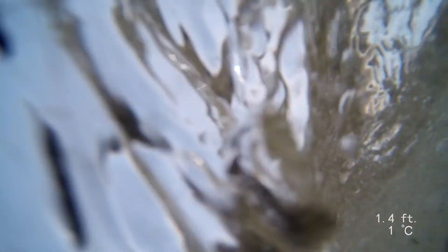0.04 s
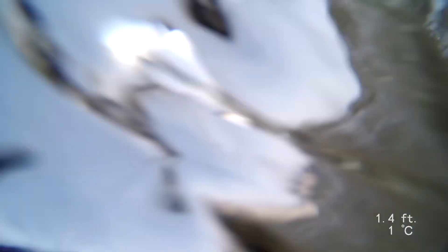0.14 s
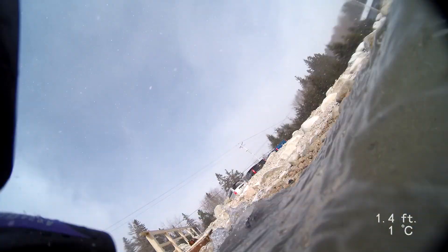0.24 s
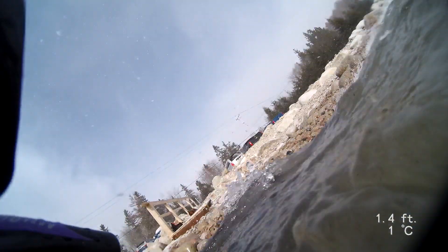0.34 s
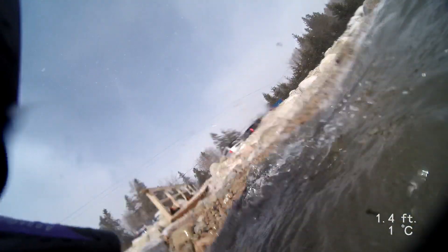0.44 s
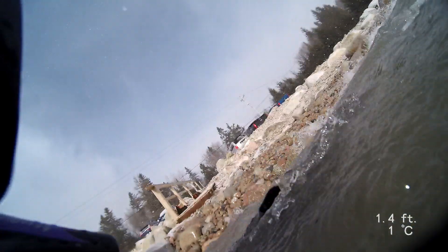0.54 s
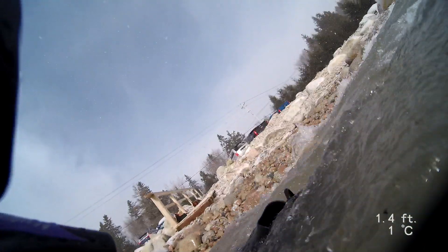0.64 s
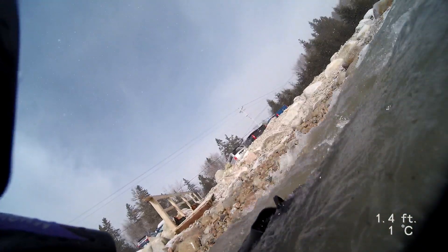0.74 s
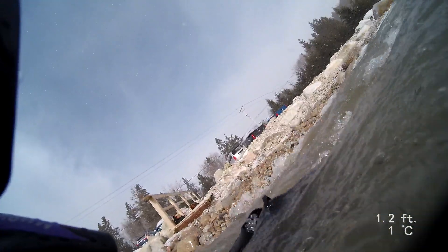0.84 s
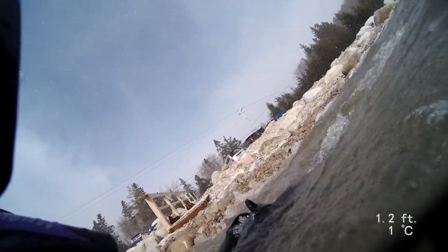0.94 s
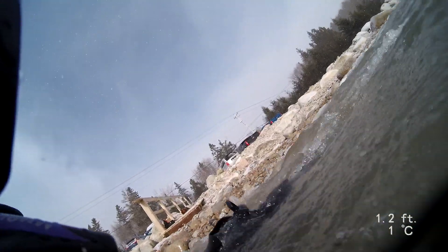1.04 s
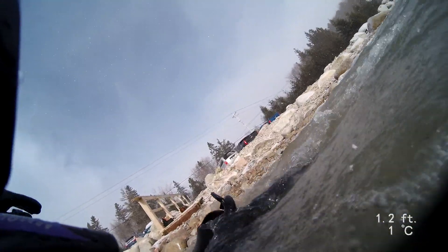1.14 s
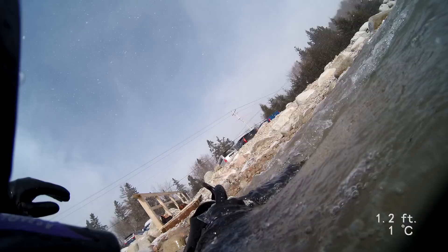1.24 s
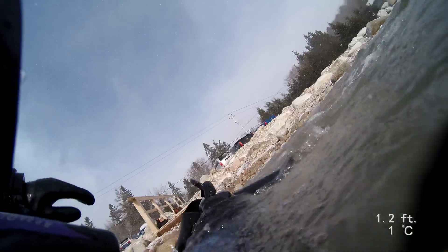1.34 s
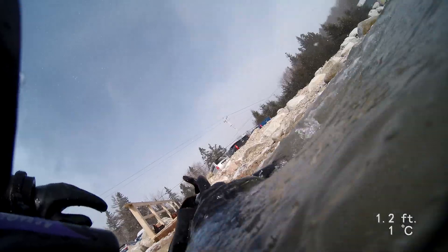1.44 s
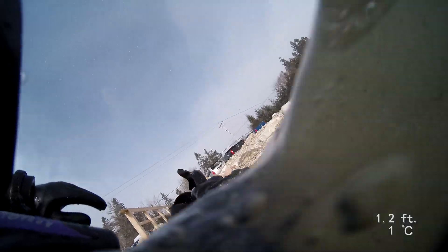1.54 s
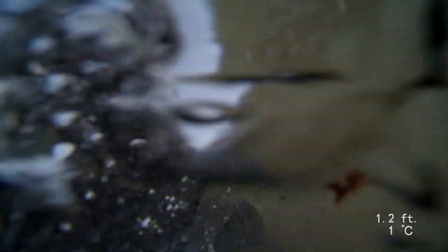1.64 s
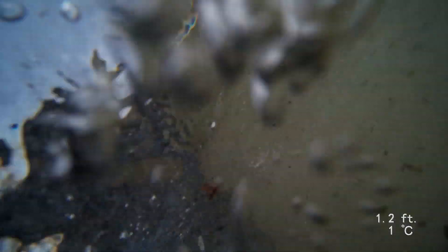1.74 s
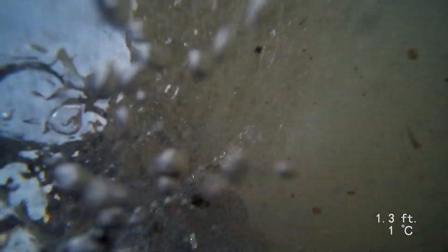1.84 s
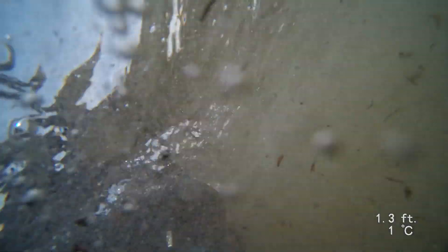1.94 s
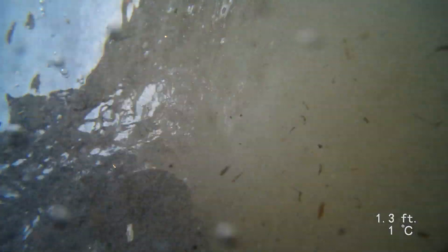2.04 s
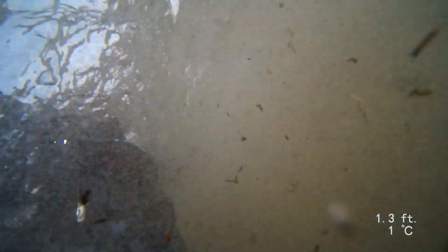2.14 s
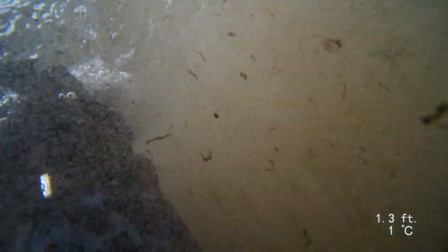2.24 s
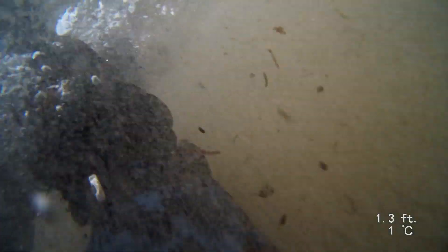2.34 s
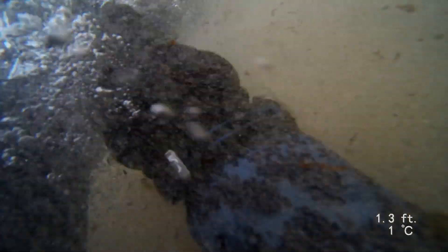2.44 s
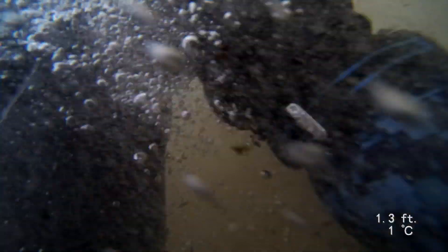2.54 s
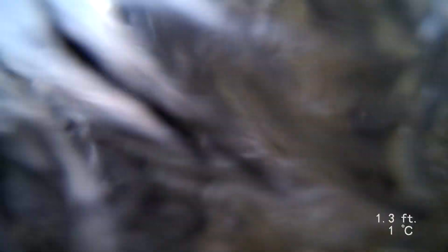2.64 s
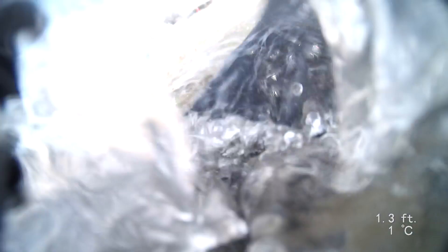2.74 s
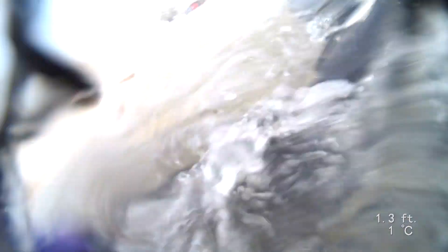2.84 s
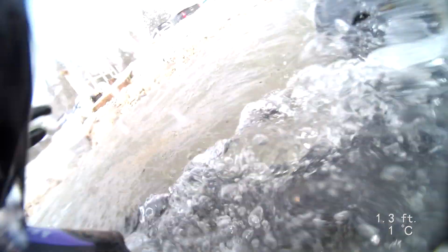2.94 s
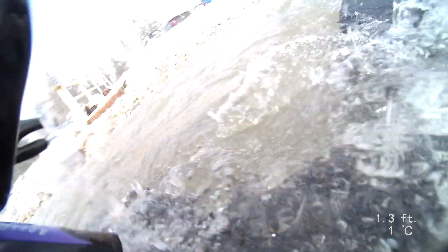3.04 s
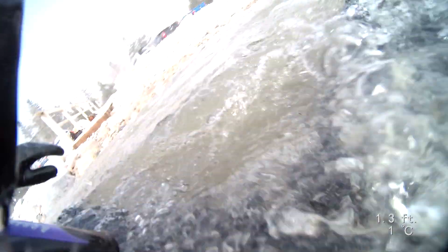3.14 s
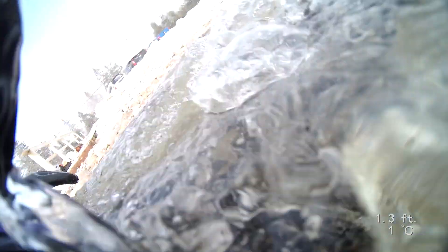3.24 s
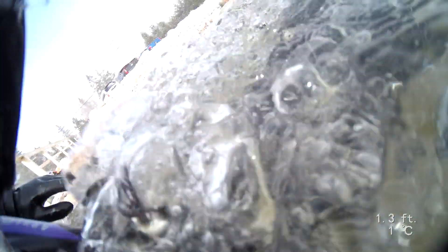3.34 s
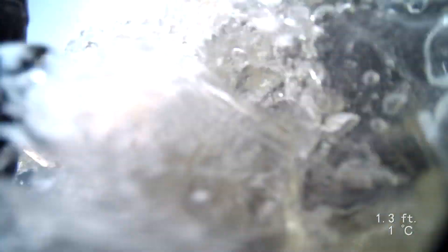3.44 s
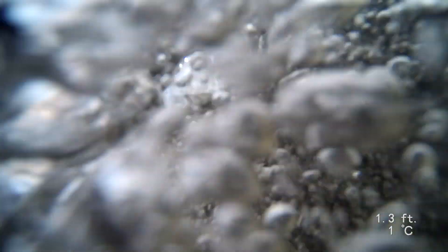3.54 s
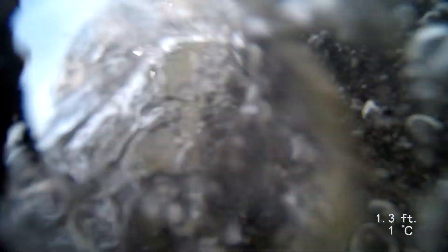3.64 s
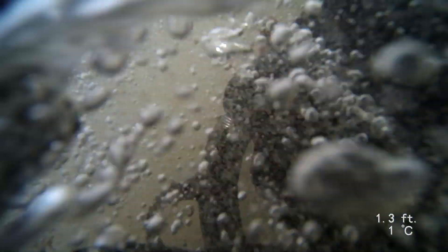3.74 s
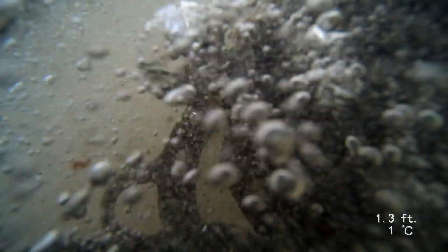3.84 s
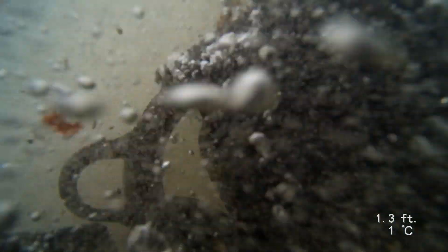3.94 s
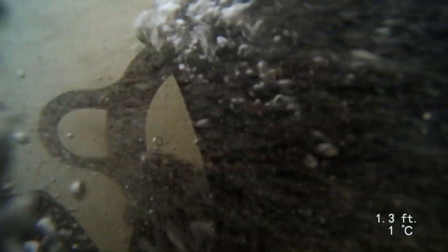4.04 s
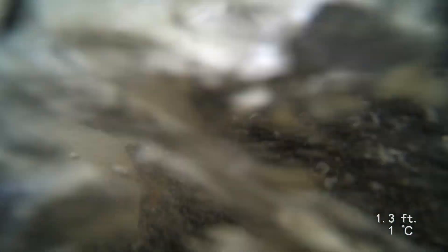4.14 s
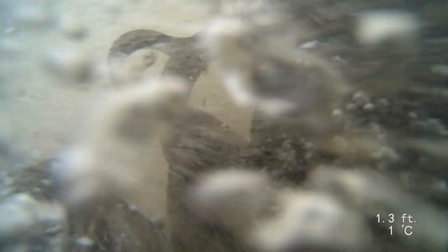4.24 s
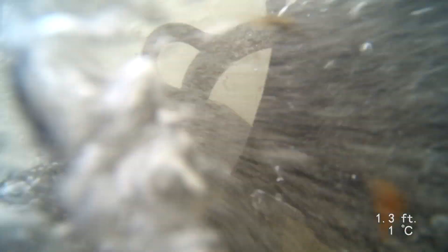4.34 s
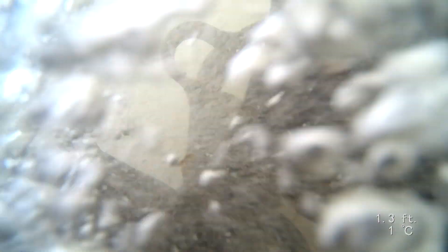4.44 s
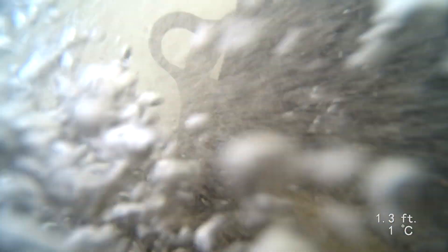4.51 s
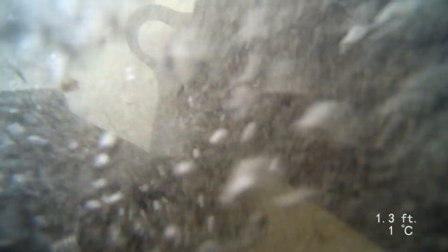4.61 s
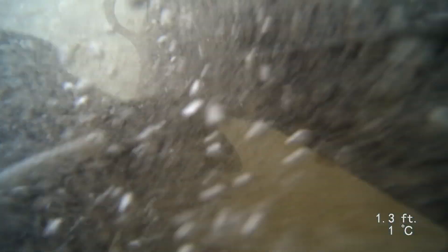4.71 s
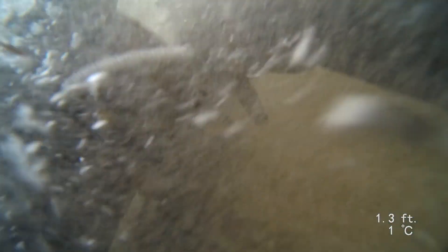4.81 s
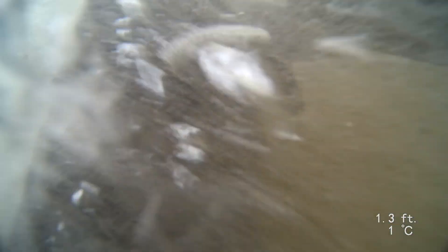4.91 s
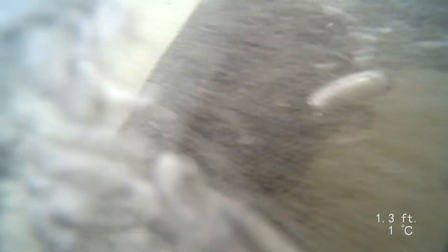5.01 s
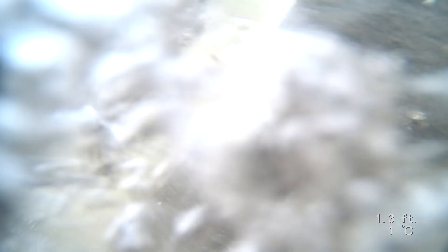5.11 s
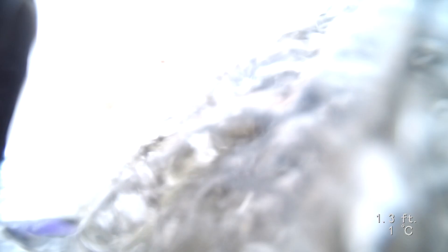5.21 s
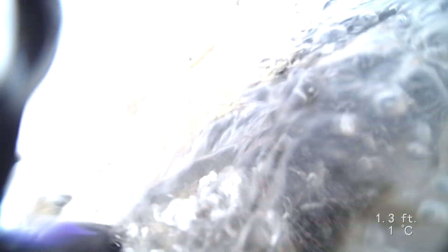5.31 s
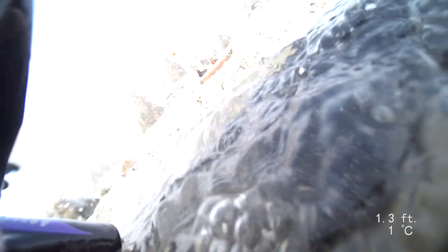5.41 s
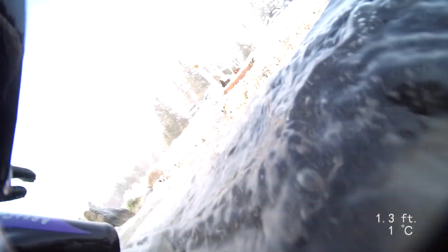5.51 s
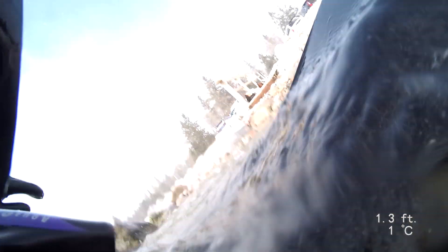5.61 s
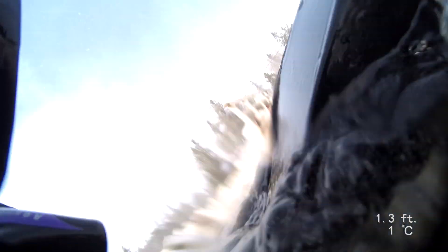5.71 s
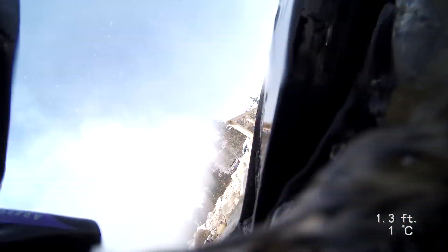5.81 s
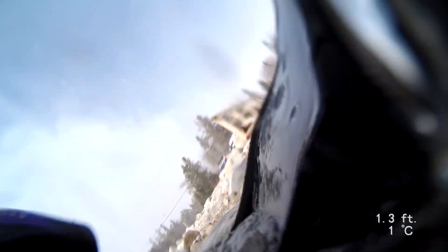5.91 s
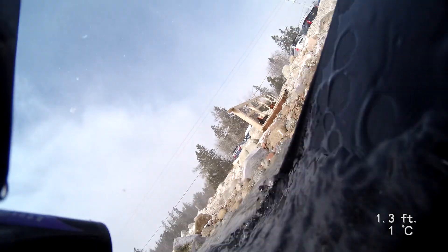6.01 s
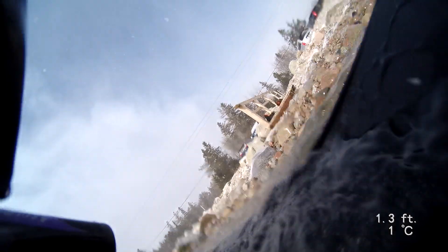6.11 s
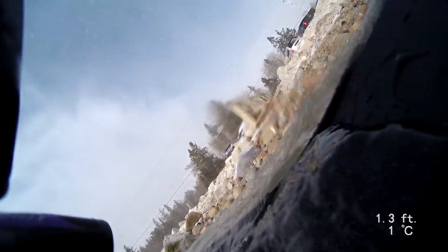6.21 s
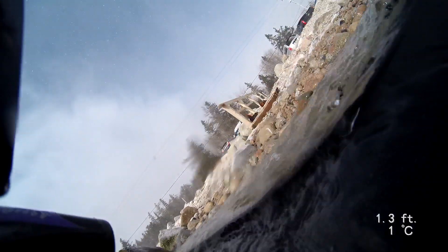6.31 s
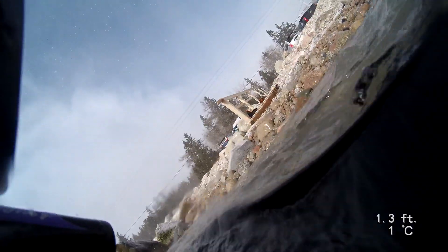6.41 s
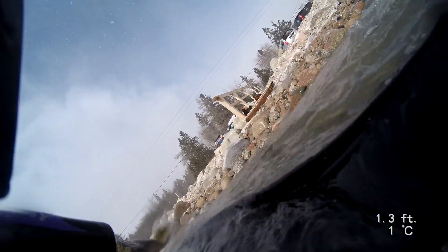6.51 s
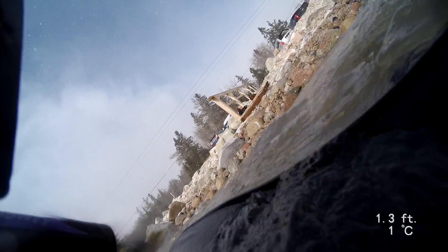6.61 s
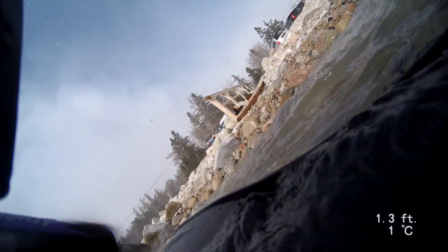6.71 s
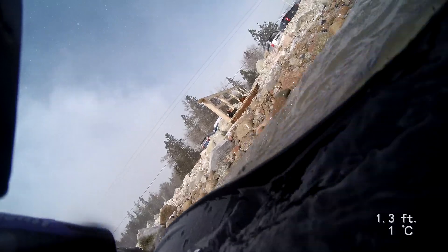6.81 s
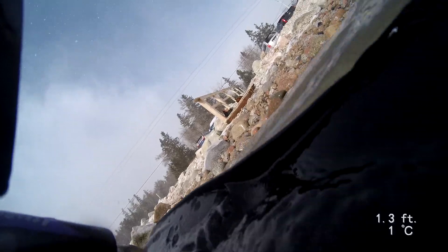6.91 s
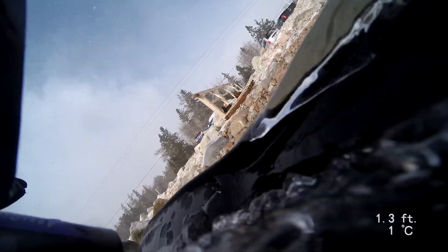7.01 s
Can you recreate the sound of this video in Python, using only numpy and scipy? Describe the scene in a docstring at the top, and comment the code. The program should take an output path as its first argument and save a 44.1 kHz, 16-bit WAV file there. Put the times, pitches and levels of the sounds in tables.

```python
"""In shallow water, someone wades with a camera in a waterproof case.
Sloshing is made of many random bubbles, slaps and noise; spray is a crowd of tiny bursts and pings.
Single bubbles, drops, gliding tones and soft thumps stand out, with two hisses of draining water.
The case lets little of the sloshing's bass through and adds a hollow ring, strong near 1 kHz.
Behind it all are steady microphone hiss and a thin electronic whine."""
import sys
import numpy as np
from scipy import signal
from scipy.fft import irfft
from scipy.io import wavfile
from scipy.ndimage import uniform_filter1d, map_coordinates

SR = 44100
rng = np.random.default_rng(int(sys.argv[2]) if len(sys.argv) > 2 else 0)


def put_to_file(sound):
    """Save the sound as 16-bit audio at rate SR, in the file named by the first command-line argument."""
    columns = np.atleast_2d(sound).T  # one column per channel
    safe = np.clip(columns, -1, 1)
    whole_steps = np.round(safe * 32767)
    wavfile.write(sys.argv[1], SR, whole_steps.astype(np.int16))


N = 311346
TIME = np.arange(N) / SR  # seconds
BINS = np.linspace(0, SR / 2, 4097)  # frequencies in Hz at which filters are drawn


def amp(db):
    """Turns decibels into a plain factor."""
    return 10 ** (np.asarray(db) / 20)


def evened(x):
    """Scales a sound to unit average loudness (RMS)."""
    return x / np.sqrt(np.mean(x ** 2) + 1e-20)


def add(mix, start_s, sound):
    """Adds a sound into the mix at a start time, cut off at the end of the mix."""
    part = mix[max(round(start_s * SR), 0):][:len(sound)]
    part += sound[:len(part)]


def curve(rows, axis=1):
    """One column of a table, joined by straight lines in time."""
    columns = np.transpose(rows)
    return np.interp(TIME, columns[0], columns[axis])


def read(points, hz):
    """Reads a colour in dB between its points, on a log-frequency axis."""
    point_hz, db = np.transpose(points)
    return np.interp(np.log(hz + 1), np.log(point_hz), db)


def causal(db):
    """The filter with this gain that responds as early as possible (minimum phase)."""
    mirrored_db = np.r_[db, db[-2:0:-1]]
    log_gain = np.log(amp(mirrored_db))
    spectrum = np.exp(np.conj(signal.hilbert(log_gain)))
    return irfft(spectrum[:len(db)])[:len(db)]


# Resonances of the case. Each row: pitch in Hz, width in Hz, level in dB before the overall slope is removed.
CASE_RESONANCES = [(798.4, 55, -5), (999, 115, -8), (1395, 40, -10), (1750, 160, -12.5), (2072, 180, -10.5),
                   (2930, 80, -11.5), (3787, 370, 1.5), (4870, 80, -11), (6000, 380, 3.5), (7140, 93, -16),
                   (8230, 320, -10), (12700, 180, -28), (14100, 700, -36)]


def case_ripple():
    """Peaks and valleys of the case's resonances in dB, without their overall slope."""
    power = sum(amp(db) ** 2 / (1 + (2 * (BINS - hz) / width) ** 2) for hz, width, db in CASE_RESONANCES)
    db = 10 * np.log10(power)
    return db - uniform_filter1d(db, size=170)


def tint(x, colour, ring=0):
    """Filters a sound to a colour; ring sets how strongly the case's resonances shape it."""
    return signal.oaconvolve(x, causal(read(colour, BINS) + ring * case_ripple()))[:N]


def steadied(x, seconds):
    """Evens out the loudness over about the given time, with the finer grain left in."""
    window = signal.windows.hann(int(seconds * SR))
    power = signal.oaconvolve(evened(x) ** 2, window / window.sum(), "same")
    return evened(x) / np.sqrt(abs(power) + 0.0018)


CLUMP_S = 0.024  # seconds; churned water breaks in uneven clumps


def clumps(seconds=CLUMP_S):
    """Random swells and gaps of about this length, of unit size."""
    window = signal.windows.hann(int(seconds * SR))
    return evened(signal.oaconvolve(rng.standard_normal(N), window, "same"))


RING_WANDER, WANDER_S = 0.028, 0.22  # typical drift as a share of pitch, length of a drift in seconds


def wandering(x):
    """Plays a sound slightly faster and slower, so its ring drifts as water covers more or less of the case."""
    place = np.cumsum(1 + RING_WANDER * clumps(WANDER_S))
    return map_coordinates(x, [place], order=3, mode="mirror")


def bubble(hz, t60, glide_per_s=4.8, swell=31.0, kick=0.031):
    """Trapped air starts with a kick, swells into a ring and glides in pitch; t60 is its fade in seconds."""
    t = np.arange(int(1.3 * t60 * SR)) / SR
    age = t / t60
    fade = np.exp(-np.log(1000) * age)  # 60 dB down at age 1
    level = (kick + (1 - np.exp(-swell * age)) ** 2) * fade
    level *= 1 - np.exp(-2 * hz * t)  # even the kick takes about half a cycle
    turns = hz * t * (1 + glide_per_s * t / 2) + rng.random()
    return level / level.max() * np.sin(2 * np.pi * turns)


GLIDE_SPREAD_PER_S = 14  # widest glide in one second, as a share of the bubble's pitch


def stray_bubble(hz, t60):
    """A bubble that glides up or down by chance."""
    return bubble(hz, t60, glide_per_s=GLIDE_SPREAD_PER_S * rng.uniform(-0.98, 1))


def spatter(hz, burst_s, octaves=0.32, skirt_db=-24):
    """Water smacks the case: a very short burst of noise, focused around a pitch and weak in the bass."""
    t = np.arange(int(7 * burst_s * SR)) / SR
    burst = rng.standard_normal(len(t)) * t ** .5 * np.exp(-t / burst_s)
    focus_db = np.maximum(-4 * (np.log2((BINS + 1) / hz) / octaves) ** 2, skirt_db)
    bass_cut_db = read([(300, -24), (750, 0)], BINS)
    smack = signal.fftconvolve(burst, causal(focus_db + bass_cut_db)[:512])
    return smack / abs(smack).max()


def clicks(per_s, spread_db):
    """Random impulses: many small, a few large."""
    size = amp(spread_db * np.minimum(rng.exponential(1, N), 4))
    return size * rng.choice([-1, 1], N) * (rng.random(N) < per_s / SR)


def swarm(grain, low_hz, high_hz, per_s, length_s, spread_db, count=64):
    """Grains of many pitches, each at its own random moments; the higher ones are shorter on average."""
    out = np.zeros(N)
    tries = 200  # possible moments for each pitch
    for hz in np.geomspace(low_hz, high_hz, count):
        length = length_s * (.5 + rng.random()) * np.sqrt(low_hz / hz)
        sound = grain(hz, length)
        sound = sound / np.linalg.norm(sound)
        for at, size, chance in rng.random((tries, 3)):
            if chance < per_s * N / SR / count / tries:
                add(out, at * N / SR, sound * amp(-spread_db * np.log(max(size, .02))))
    return evened(out)


# Surges of water against the case, each a swell, a hold and an ebb. Each row: start of full strength
# in seconds, hold, swell and ebb in seconds, then sloshing, spray and flow in dB at mid-hold, before
# each layer's own mixing and clumps.
SURGES = [(-0.009, 0.26, 0.1, 0.044, -41.5, -55.5, -70), (0.161, 0.23, 0.0087, 0.026, -40.5, -52, -71),
          (1.474, 0.049, 0.055, 0.012, -56, -57, -84), (1.536, 0.031, 0.012, 0.034, -35, -44, -67),
          (1.593, 0.17, 0.04, 0.1, -37, -48.5, -59), (1.85, 0.12, 0.0059, 0.076, -56.5, -63, -74),
          (2.109, 0.071, 0.018, 0.045, -58, -60.5, -72.5), (2.323, 0.076, 0.013, 0.027, -83, -57.5, -78),
          (2.418, 0.035, 0.0086, 0.056, -42.5, -53, -64), (2.5, 0.015, 0.025, 0.034, -40.5, -55, -80),
          (2.614, 0.14, 0.082, 0.13, -35.5, -45.5, -64), (3.552, 0.076, 0.017, 0.068, -44, -51.5, -61.5),
          (3.821, 0.035, 0.0067, 0.28, -40, -56.5, -64), (3.979, 0.011, 0.074, 0.068, -34, -48, -58),
          (4.119, 0.25, 0.11, 0.28, -33, -49.5, -58), (4.405, 0.18, 0.033, 0.13, -36.5, -56, -57.5),
          (4.665, 0.055, 0.026, 0.26, -34, -51, -57.5), (4.923, 0.08, 0.2, 0.047, -34, -56.5, -61),
          (5.026, 0.081, 0.082, 0.11, -31, -40, -58.5), (5.143, 0.043, 0.082, 0.1, -32.5, -59, -58.5),
          (5.647, 0.0049, 0.0092, 0.014, -30.5, -37.5, -75),
          (5.692, 0.01, 0.011, 0.034, -30.5, -42.5, -53.5), (5.799, 0.16, 0.059, 0.06, -40, -54.5, -67),
          (5.949, 0.059, 0.069, 0.05, -42.5, -58, -83), (6.941, 0.099, 0.038, 0.087, -33.5, -46, -61.5)]
# Change in dB over the hold, in this order: sloshing, spray, flow.
SURGE_TREND_DB = (0.5, -2.5, -1)
SURGE_DEPTH_DB = 20  # what a surge gains over its swell time and loses over its ebb time
CALM_SPRAY_DB, CALM_FLOW_DB = -63.5, -81.5  # between surges, before each layer's own mixing


def stirred(calm_db, axis):
    """Level in dB of sloshing (axis 0), spray (1) or flow (2): surges add their power to the calm water."""
    t = TIME[::40]
    power = np.zeros(len(t))
    for s, hold, swell, ebb, *levels_db in SURGES:
        away = np.maximum(s - t, 0) / swell + np.maximum(t - s - hold, 0) / ebb
        trend_db = SURGE_TREND_DB[axis] * (np.clip((t - s) / hold, 0, 1) - .5)
        surge_db = levels_db[axis] + trend_db - SURGE_DEPTH_DB * np.minimum(away, 10)
        power += amp(surge_db) ** 2
    return 10 * np.log10(amp(calm_db) ** 2 + np.interp(TIME, t, power))


# Colours of the churned water and of the soft wash. Each row: frequency in Hz, relative level in dB.
SLOSH_COLOUR = [(30, -65), (170, -25), (350, -42), (560, -11), (760, -7), (980, 4.5), (1200, -3),
                (1900, -2.5), (2700, -10.5), (4000, -47), (8000, -76), (16000, -86)]
LAPPING_COLOUR = [(100, -19.5), (600, -24.5), (850, -4), (1000, 1), (1300, -7.5), (2100, -5), (3000, -20.5),
                  (8000, -34)]
# Ripples lapping between surges. Each row: time in seconds, level in dB before near and far water are mixed.
CALM = [(0.4, -56), (1.12, -57.5), (1.38, -64.5), (2.0, -59.5), (2.85, -60), (3.42, -61.5), (3.65, -57),
        (5.25, -50), (5.36, -63), (5.6, -70.5), (6.2, -60), (6.42, -71.5), (6.85, -62.5)]
CLUMP_DB = 2  # typical swing of the sloshing


def sloshing(bunching):
    """Churned water: big bubbles and slaps over a froth, with more small bubbles as spray gains on sloshing."""
    level_db = stirred(curve(CALM), axis=0)
    spray_db = stirred(CALM_SPRAY_DB, axis=1)
    big = swarm(stray_bubble, 675.0, 1445, per_s=420, length_s=0.039, spread_db=3.5)
    small = swarm(stray_bubble, 1410, 4940, per_s=400, length_s=0.028, spread_db=7.0)
    slaps = swarm(spatter, 863, 4570, per_s=400, length_s=0.003, spread_db=5.0)
    froth = rng.standard_normal(N)
    small_db = np.clip(spray_db - level_db + 21.0, 2, 10)
    churn = big + amp(small_db) * small + amp(-1.5) * slaps + amp(-6.0) * froth
    churn = wandering(tint(churn, SLOSH_COLOUR, ring=1.0))
    near = steadied(churn, 0.066) * amp(CLUMP_DB * bunching)
    # in calm moments almost only the soft wash of ripples along the shore is left
    ripples = swarm(bubble, 735, 3270, per_s=270, length_s=0.021, spread_db=4.5)
    wash = rng.standard_normal(N) + amp(-7.0) * ripples
    far = steadied(tint(wash, LAPPING_COLOUR, ring=1.0), 0.13)
    far_share = np.clip(np.interp(level_db, [-54, -44], [1, .02]), 0, 1)
    return amp(level_db) * (np.sqrt(1 - far_share) * near + np.sqrt(far_share) * far)


# Colour of the spray and of the bubbles' smacks. Each row: frequency in Hz, relative level in dB.
SPRAY_COLOUR = [(100, -50), (600, -54), (1000, 12), (2500, 1.5), (4000, -7), (6000, -9.5), (8500, -11.5),
                (11000, -14.5), (15000, -10)]
SPRAY_CLUMP_DB = 3  # typical swing of the spray


def spray(bunching):
    """Droplets patter on the case and tiny bubbles ping; heavy spray crackles, calm water has almost none."""
    spray_db = stirred(CALM_SPRAY_DB, axis=1)
    level = np.maximum(amp(spray_db) - amp(-66), 0)  # the subtraction thins out the calm
    patter = swarm(spatter, 2360, 25900, per_s=340, length_s=0.0019, spread_db=7.0)
    fizz = swarm(bubble, 3104, 12500, per_s=820, length_s=0.011, spread_db=6.5)
    crowd = swarm(spatter, 2300, 10500, per_s=1700, length_s=0.0009, spread_db=3.0)
    rush = amp(np.interp(spray_db, [-52, -42], [-16, 2])) * crowd
    droplets = tint(patter + amp(0.5) * fizz + rush, SPRAY_COLOUR, ring=1.0)
    return amp(5.5 + SPRAY_CLUMP_DB * bunching) * level * steadied(droplets, 0.14)


# Single bubbles that stand out. Each row: start in seconds, level of the ring in dB, pitch in Hz,
# time in seconds to fade by 60 dB.
BUBBLES = [(0.034, -31, 820, 0.043), (0.073, -28, 1500, 0.006), (0.113, -28, 2920, 0.0099),
           (0.172, -30.5, 810, 0.03), (0.259, -26, 970, 0.031), (0.315, -17, 3570, 0.0041),
           (0.322, -22, 2900, 0.012), (0.338, -20, 956, 0.048), (0.802, -32, 1445, 0.026),
           (0.804, -21, 3680, 0.013), (1.531, -26, 1044, 0.016), (1.539, -26.5, 2430, 0.0083),
           (1.549, -23.5, 1098, 0.02), (1.654, -19.5, 930, 0.024), (1.703, -18, 900, 0.017),
           (1.738, -22, 1810, 0.009), (1.747, -28, 803, 0.028), (1.746, -24, 1590, 0.019),
           (1.8, -32, 1400, 0.0061), (1.848, -29.5, 863, 0.018), (1.86, -31.5, 947, 0.026),
           (1.901, -32, 1200, 0.004), (1.915, -25, 2630, 0.0029), (1.945, -32, 1680, 0.0034),
           (2.129, -32.5, 2960, 0.016), (2.19, -41.5, 1610, 0.016), (2.319, -39, 1070, 0.007),
           (2.416, -30, 1520, 0.005), (2.425, -31, 2880, 0.0074), (2.495, -30.5, 1210, 0.013),
           (2.499, -28.5, 2900, 0.008), (2.558, -28, 1307, 0.033), (2.587, -22, 1970, 0.011),
           (2.618, -22.5, 2470, 0.02), (2.683, -26.5, 945, 0.082), (2.689, -22, 1550, 0.014),
           (2.726, -21.5, 995, 0.055), (2.75, -35, 1803, 0.037), (3.492, -43, 914, 0.027),
           (3.553, -23.5, 3260, 0.011), (3.627, -34, 2050, 0.024), (3.828, -34, 1024, 0.029),
           (3.872, -30, 926, 0.028), (3.972, -24, 1490, 0.0088), (4.21, -17, 1310, 0.012),
           (4.214, -14, 902, 0.01), (4.243, -27, 1940, 0.012), (4.255, -22.5, 1870, 0.021),
           (4.32, -20, 2070, 0.0074), (4.343, -20, 895, 0.011), (4.36, -25, 1940, 0.014),
           (4.369, -23.5, 3860, 0.0073), (4.525, -23.5, 977, 0.042), (4.904, -20, 1980, 0.019),
           (5.031, -24.5, 1373, 0.033), (5.085, -14.5, 1790, 0.011), (5.093, -24, 1060, 0.037),
           (5.114, -25.5, 1027, 0.043), (5.215, -34, 2070, 0.022), (5.409, -47.5, 956, 0.037),
           (5.644, -16, 1000, 0.033), (5.644, -15, 2300, 0.016), (5.696, -25, 955, 0.066),
           (5.793, -16, 1104, 0.011), (5.817, -24, 960, 0.023), (5.833, -16.5, 1915, 0.019),
           (5.844, -19.5, 848, 0.025), (5.881, -22, 1265, 0.017), (5.901, -21, 1070, 0.038),
           (6.625, -42, 2760, 0.014), (6.926, -25.5, 3670, 0.0082), (6.941, -18.5, 3700, 0.0053),
           (6.955, -24, 990, 0.063), (6.958, -21.5, 2250, 0.0072), (7.011, -20.5, 1210, 0.013),
           (7.025, -17.5, 790, 0.044)]


def plops():
    """Single near bubbles: each pinches off with a smack and rings, sinking slightly in pitch."""
    rings, smacks = np.zeros(N), np.zeros(N)
    for s, db, hz, t60 in BUBBLES:
        add(rings, s, amp(db) * bubble(hz, t60, glide_per_s=-1.33, swell=6.3))
        add(smacks, s, amp(db - 6.0) * spatter(hz, 0.0017, octaves=0.64, skirt_db=-27.0))
    return rings + tint(smacks, SPRAY_COLOUR, ring=0.91)


# Drops that hit the case. Each row: start in seconds, strength in dB before the cuts and the case's
# ring below, brightness in Hz.
DROPS = [(0.03, -19.5, 8460), (0.151, -20, 3700), (0.164, -23, 2980), (0.173, -12.5, 6800),
         (0.397, -20.5, 4160), (0.452, -22.5, 8900), (0.59, -7.5, 8500), (0.687, -22.5, 4050),
         (0.747, -24.5, 2700), (0.781, -27, 12000), (0.804, -21, 3440), (1.506, -17, 2650),
         (1.552, -8.5, 5400), (1.565, -10.5, 11600), (1.617, -9.5, 2800), (1.653, -8, 7100),
         (1.689, -12.5, 3600), (2.445, -20.5, 4760), (2.704, -9, 4600), (2.726, -9, 4860),
         (2.772, -12.5, 3910), (2.833, -26, 4430), (2.888, -22.5, 9160), (3.321, -18.5, 6900),
         (3.554, -11, 8650), (3.819, -18.5, 4170), (4.053, -15, 8500), (4.13, -11, 3570),
         (4.151, -15, 5500), (4.211, -11.5, 1850), (4.252, -13.5, 14300), (4.593, -17.5, 4900),
         (4.669, -13.5, 4070), (4.707, -12.5, 3330), (4.905, -12, 5340), (4.981, -14, 4800),
         (5.044, -9.5, 4630), (5.096, -12.5, 6560), (5.142, -17, 4200), (5.637, -11, 5100),
         (5.881, -13, 8700), (5.949, -17, 3130), (6.001, -20.5, 3150), (6.019, -27.5, 3000),
         (6.161, -24, 10300), (6.31, -26, 9200), (6.912, -8, 12070)]


def drops():
    """Larger drops land on the case, trap a tiny bubble and make the case ring."""
    out = np.zeros(N)
    for s, db, hz in DROPS:
        add(out, s, amp(db - 9.5) * spatter(hz, 0.00027, octaves=0.66, skirt_db=-7.0))
        add(out, s, amp(db - 13.0) * bubble(hz, 0.0055))
    return signal.oaconvolve(out, causal(1.62 * case_ripple()))[:N]


# Gliding bubbles, large and small, and low pushes of water. Each row: start in seconds, peak in dB,
# starting pitch in Hz, length in seconds, glide in octaves.
GLIDES = [(0.354, -22.5, 622, 0.041, 0.9), (3.031, -48.5, 79, 0.1, -0.24), (3.05, -54.5, 146, 0.058, -0.24),
          (3.597, -29, 1240, 0.02, 0.33), (3.674, -44.5, 610, 0.066, 0.66), (3.92, -58, 207, 0.079, 0.4),
          (4.204, -40.5, 488, 0.048, -0.2), (4.616, -64, 302, 0.24, -0.39), (4.82, -42, 202, 0.083, -0.53),
          (4.853, -23, 2144, 0.012, 0.17), (5.063, -27.5, 623, 0.015, 0.28),
          (5.172, -39.5, 495, 0.016, 0.18), (6.067, -43.5, 2200, 0.018, 0.43)]
GLIDE_WOBBLE_OCTAVES = 0.045  # typical random wobble of the pitch


def glides():
    """Gliding bubbles, large and small, and low pushes of water: tones that swell, fade, wobble and glide."""
    out = np.zeros(N)
    for s, db, hz, length, glide in GLIDES:
        age = np.linspace(0, 1, int(length * SR))
        bend_octaves = glide * age + GLIDE_WOBBLE_OCTAVES * clumps()[:len(age)]
        turns = np.cumsum(hz * 2 ** bend_octaves) / SR
        add(out, s, amp(db) * np.sin(np.pi * age ** 0.69) ** 2 * np.sin(2 * np.pi * turns))
    return out


# Colour of the push of flowing water. Each row: frequency in Hz, relative level in dB.
PUSH_COLOUR = [(25, -7.0), (70, 1.5), (170, -5.5), (300, -7.5), (470, -12.5), (2000, -44.0)]


def flow():
    """Flowing water: a low push of filtered impulses with a gurgle of large bubbles, rising in each surge."""
    push = tint(clicks(900, spread_db=4.0), PUSH_COLOUR)
    gurgle = swarm(stray_bubble, 297.4, 639, per_s=110, length_s=0.1, spread_db=5.0)
    current = steadied(evened(push) + amp(-1.5) * gurgle, 0.64)
    return amp(stirred(CALM_FLOW_DB, axis=2)) * current


# Soft thumps of water shoving the case. Each row: start in seconds, peak in dB, pitch in Hz.
THUMPS = [(1.572, -47, 106), (1.626, -46, 121), (1.668, -35.5, 180), (1.803, -47, 141), (3.445, -51.5, 48),
          (4.207, -42, 150)]
THUMP_CYCLES = 2.5  # cycles until a thump has faded by 60 dB


def thumps():
    """A plunge shoves the case: a few low cycles, gone at once."""
    out = np.zeros(N)
    for s, db, hz in THUMPS:
        add(out, s, amp(db) * bubble(hz, THUMP_CYCLES / hz))
    return out


# Sheets of water draining off. Each row: fullest moment in seconds, length in seconds,
# level in dB at the fullest, pitch in Hz.
RUNOFF = [(3.17, 0.3, -66, 5950), (6.22, 0.42, -64, 1980)]


def runoff():
    """Draining water hisses softly in a narrow band of noise that swells and fades."""
    out = np.zeros(N)
    for s, length, db, hz in RUNOFF:
        band_db = -10 * np.log10(1 + ((BINS - hz) / 400) ** 4)  # 400 Hz to either side
        hiss = signal.oaconvolve(rng.standard_normal(N), causal(band_db))[:N]
        swell = np.cos(np.pi * np.clip((TIME - s) / length, -.5, .5))
        out += amp(db) * swell * evened(hiss)
    return out


# Colour of the microphone's hiss. Each row: frequency in Hz, relative level in dB.
HISS_COLOUR = [(12, -27), (28, 2), (100, -8), (330, -13.5), (900, -17), (2000, -13.5), (3500, -19.5),
               (15500, -21.5)]
HISS_DB = -63.5  # average level
WHINE_HZ, WHINE_DB = 12300, -79.5  # pitch, average level


def floor():
    """Steady hiss of the microphone (coloured noise) and a thin electronic whine (a pure tone)."""
    hiss = amp(HISS_DB) * evened(tint(rng.standard_normal(N), HISS_COLOUR))
    whine = amp(WHINE_DB) * np.sqrt(2) * np.sin(2 * np.pi * WHINE_HZ * TIME)
    return hiss + whine


def scene():
    """All layers together; sloshing and spray share the same clumps."""
    bunching = clumps()
    water = sloshing(bunching) + spray(bunching) + plops() + drops()
    water += glides() + flow() + thumps() + runoff()
    return (water + floor())[None]


EDGE_HZ = 15700  # the treble is cut above this


def record(dry):
    """The recorder's band limit: a steep low-pass filter."""
    low_pass = signal.firwin(201, EDGE_HZ, window=("kaiser", 8), fs=SR)
    return signal.oaconvolve(dry, low_pass[None], "same")


dry = scene()
out = record(dry)
put_to_file(out)
```